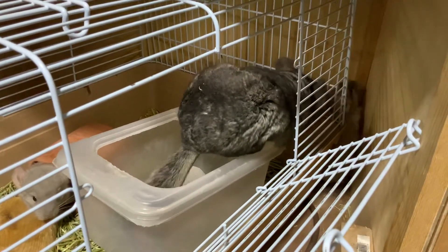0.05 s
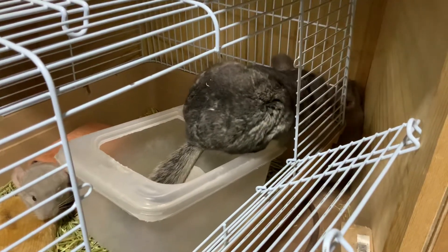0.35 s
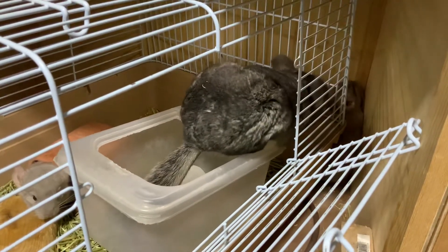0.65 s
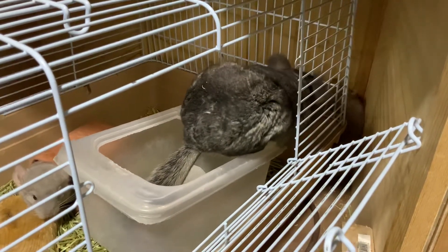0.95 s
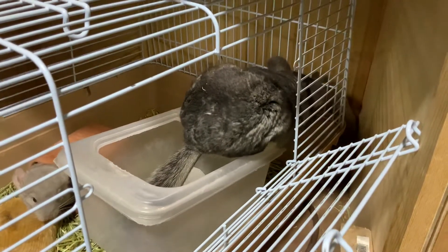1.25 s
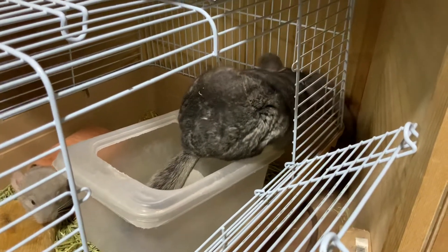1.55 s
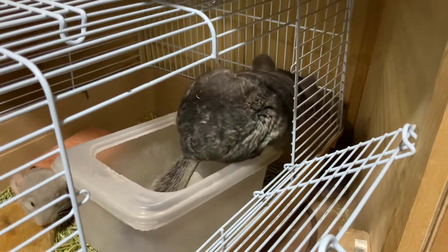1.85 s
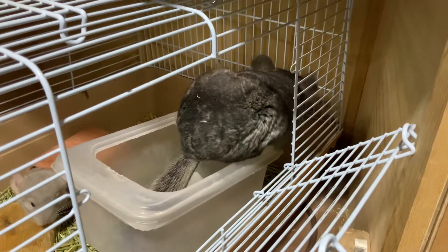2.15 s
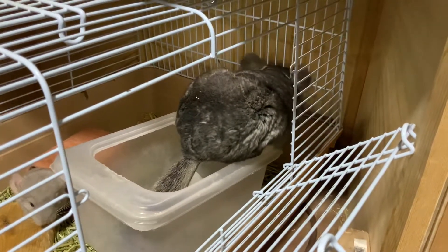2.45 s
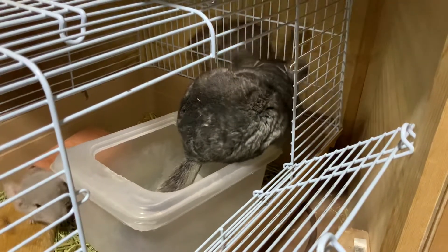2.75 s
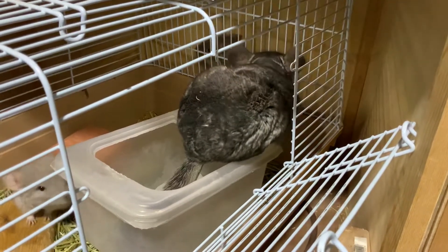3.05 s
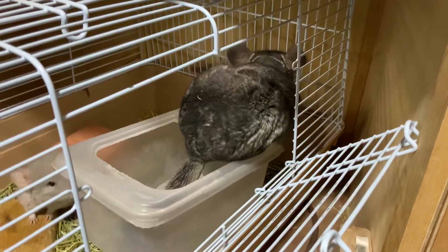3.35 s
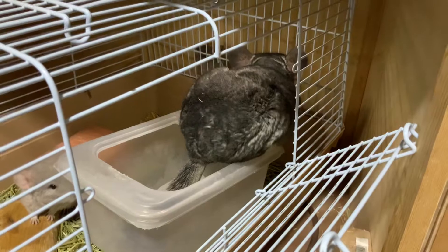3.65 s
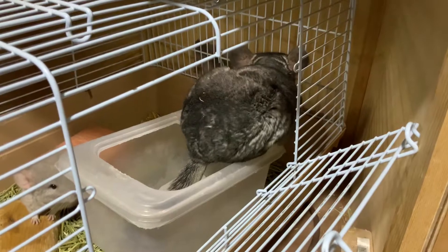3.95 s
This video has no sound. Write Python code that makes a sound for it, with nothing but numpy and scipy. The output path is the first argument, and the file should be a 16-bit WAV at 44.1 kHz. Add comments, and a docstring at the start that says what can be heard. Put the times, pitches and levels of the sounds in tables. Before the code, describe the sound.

One loud, two-part squeak of cage wire rings out briefly at about 2.9 seconds. Before it, a chinchilla shifts in a plastic tub: faint fur rustles and grit ticks, growing busier from 2 seconds with hollow paw taps and soft thumps. A knock follows at 3.2 seconds and the rustling fades by 4. The quiet room holds a low rumble and a faint throbbing hiss.

```python
"""Cage wire gives one loud, two-part squeak with a metallic ring near three seconds, most likely as a
chinchilla pushes on it: the wire catches, scrapes by stick-slip friction and springs free. The animal
shifts about in a plastic tub inside the cage: fur rustles, grit ticks, paws tap the hollow tub and its
body thumps softly. The quiet room holds a rumble, an ebbing drone, a faint throbbing hiss and,
barely audible, a whine and two whistles."""
import sys
import numpy as np
from scipy import signal
from scipy.fft import rfft, irfft
from scipy.io import wavfile

SR = 44100
rng = np.random.default_rng(int(sys.argv[2]) if len(sys.argv) > 2 else 0)


def to_wav(sig):
    """Store sig (one row per channel, or 1-D mono) as 16-bit WAV at the path in sys.argv[1].

    Samples outside -1..1 are clipped; the rate is SR.
    """
    pcm = np.clip(np.atleast_2d(sig), -1, 1) * 32767
    pcm = np.round(pcm).astype(np.int16)
    wavfile.write(sys.argv[1], SR, pcm.T)  # frames by channels


N = 176400
BAND_EDGE_HZ = 15850


def amp(db):
    """Amplitude ratio of a level in decibels."""
    return 10 ** (np.asarray(db) / 20)


def unit(x):
    """Normalisation to rms 1."""
    return x / np.sqrt(np.mean(x ** 2) + 1e-20)


def spectrum_at(points, hz):
    """Interpolation of a spectrum on a logarithmic frequency axis."""
    f, value = np.transpose(points)
    return np.interp(np.log(hz + 1), np.log(f + 1), value)


def since(s):
    """Seconds elapsed since s, zero before."""
    return np.maximum(np.arange(N) / SR - s, 0)


def pan(db):
    """Channel gains for a level difference, left minus right."""
    return amp(np.array([[db], [-db]]) / 2)


def add(mix, s, sound):
    """Superposition of a stereo sound on the mix from time s."""
    part = mix[:, round(s * SR):][:, :sound.shape[1]]
    part += sound[:, :part.shape[1]]


def wander(hz):
    """Random modulation of rms 1: low-pass noise of bandwidth hz."""
    f = np.fft.rfftfreq(N, 1 / SR)
    return unit(irfft(rfft(rng.standard_normal(N)) * np.exp(-(f / hz) ** 2), N))


def noise(colour):
    """Partially coherent stereo noise of rms 1; the common part reaches the left later."""
    # coherence of the two channels: f/Hz, coherence (0-1)
    coherence = [(30, .8), (80, 0.6), (200, 0.5), (1000, 0.2), (3300, 0.1), (4500, 0), (6700, 0),
                 (10000, 0), (15000, .88)]
    left_lag_s = .000657
    hz = np.fft.rfftfreq(N, 1 / SR)
    right, independent = rfft(rng.standard_normal((2, N)))
    common = np.clip(spectrum_at(coherence, hz), 0, 1)
    delayed = right * np.exp(-2j * np.pi * hz * left_lag_s)
    left = common * delayed + np.sqrt(1 - common ** 2) * independent
    gain = amp(spectrum_at(colour, hz)) * (hz < BAND_EDGE_HZ)
    return unit(irfft(np.array([left, right]) * gain, N))


def decay(t, t60):
    """Exponential damping, 60 dB in t60 seconds."""
    return np.exp(-np.log(1000) * t / t60)


def impact(s, rise_s, t60):
    """Impact envelope: linear rise from time s, exponential decay."""
    t = since(s)
    return np.minimum(t / rise_s, 1) * decay(t, t60)


def contacts(rows, colour, rise_s, t60):
    """Heavily damped impacts, each a burst of coloured noise."""
    return noise(colour) * sum(amp(db) * impact(s, rise_s, t60) for s, db in rows)


def room_noise():
    """Ambient noise: a steady rumble and a low drone that ebbs away."""
    # rumble spectrum: f/Hz, relative level/dB
    rumble_spectrum = [(20, -5), (32, -3), (60, -4.5), (110, -21.5), (170, -25), (250, -22.5), (350, -11),
                       (480, -27), (700, -26.5), (1000, -34.5), (1700, -41.5), (2300, -35.5), (3400, -33.5),
                       (4500, -37.5), (6700, -40.5), (8000, -46.5), (15500, -46.5)]
    # drone spectrum: f/Hz, relative level/dB
    drone_spectrum = [(120, -26.5), (200, -1.5), (260, -6.5), (330, 0.5), (400, -2.5), (480, -11.5),
                      (650, -9), (900, -25), (1500, -34.5)]
    # drone envelope: t/s, level/dB
    drone_level = [(0, -69.5), (.4, -71), (1.3, -71.5), (1.8, -84), (2.4, -83), (4, -88)]
    ebb = amp(np.interp(since(0), *np.transpose(drone_level)))
    return amp(-62.5) * noise(rumble_spectrum) + ebb * noise(drone_spectrum)


def throbbing_hiss():
    """Periodic amplitude modulation makes a thin hiss throb, as of a small motor."""
    # hiss spectrum: f/Hz, relative level/dB
    spectrum = [(1500, -38.5), (2200, -6.5), (2600, -10.5), (3130, -0.5), (3270, -2.5), (3400, 4.5),
                (3560, 5), (3660, -3.5), (3750, -1), (3950, -9.5), (4600, -12.5), (4910, -9), (5200, -12.5),
                (6000, -15.5), (6650, -4), (7050, -13), (7800, -27), (10500, -19.5), (13000, -18.5),
                (15500, -23.5)]
    # slow envelope beneath the throb: t/s, level/dB
    level = [(0, -65.5), (.7, -69.5), (1.3, -66), (2, -67), (2.6, -64), (4, -66.5)]
    throb_hz, depth, peak_s = 11.52, .55, .055
    t = since(0)
    throb = 1 + depth * np.cos(2 * np.pi * throb_hz * (t - peak_s))
    return amp(np.interp(t, *np.transpose(level))) * throb * noise(spectrum)


def grit_ticks():
    """Brief, hard contacts of grit put their energy in the treble."""
    # ticks: t/s, level/dB
    ticks = [(.1755, -58.5), (1.1368, -61), (1.4331, -60.5), (1.5229, -64), (1.7998, -51), (1.9674, -58.5),
             (2.1355, -63), (2.1909, -48.5), (2.4404, -63.5), (2.8535, -38), (3.2095, -45.5)]
    # tick spectrum: f/Hz, relative level/dB
    spectrum = [(2000, -21.5), (6000, -12.5), (8500, -0.5), (12000, 2), (15500, -2)]
    return contacts(ticks, spectrum, rise_s=0.0009, t60=0.038)


def whine():
    """Random modulation spreads a soft, falling tone into a narrow band of noise."""
    start_s, length_s, start_hz, fall_hz_per_s = 0.3, .21, 1520, 880
    t = np.minimum(since(start_s), length_s)
    tone = np.sin(2 * np.pi * (start_hz * t - fall_hz_per_s * t ** 2 / 2))
    return amp(-76.5) * np.sin(np.pi * t / length_s) * tone * wander(hz=99)


def rustle():
    """Friction noise swells and fades with each brush: grainy fur over duller bedding."""
    # brushes: t/s, duration/s, fur level/dB, bedding level/dB
    brushes = [(0.32, 0.19, -101, -70), (0.903, .16, -65.5, -64), (1.13, 0.14, -76, -82),
               (1.414, 0.26, -77, -92), (1.635, .12, -72.5, -73), (2.012, .17, -64.5, -66),
               (2.181, 0.18, -59.5, -68.5), (2.483, 0.1, -57.5, -61), (2.553, 0.083, -59.5, -56.5),
               (2.631, 0.084, -53, -53), (2.687, 0.2, -52, -60), (3.02, 0.19, -54.5, -56),
               (3.17, .18, -63.5, -66.5), (3.318, 0.18, -67, -66), (3.49, .12, -74, -76),
               (3.869, 0.32, -71, -71.5)]
    # fur spectrum: f/Hz, relative level/dB
    fur_spectrum = [(1000, -27), (3000, -4.5), (4500, -4), (7000, -5), (9300, -2), (12000, 1.5),
                    (15500, -4.5)]
    # bedding spectrum: f/Hz, relative level/dB
    bedding_spectrum = [(100, 2.5), (350, -5), (800, -1), (1500, -10), (2000, -7), (3500, -15.5),
                        (6000, -21), (12000, -36)]
    grain_db = 3
    fur, bedding = np.zeros((2, N))
    for s, length, fur_db, bedding_db in brushes:
        progress = np.minimum(since(s) / length, 1)
        arch = np.abs(np.sin(np.pi * progress)) ** 0.76
        fur += amp(fur_db) * arch
        bedding += amp(bedding_db) * arch
    friction = fur * noise(fur_spectrum) + bedding * noise(bedding_spectrum)
    return friction * unit(amp(grain_db * wander(hz=150)))


def paw_taps():
    """Each impact of a paw knocks dully and excites the resonances of the hollow tub."""
    # taps: t/s, knock level/dB, tub level/dB
    taps = [(.947, -56.5, -81), (1.392, -63, -74), (1.69, -73, -64.5), (1.712, -67, -65),
            (2.143, -58, -55.5), (2.181, -55, -53), (2.571, -58, -58.5), (2.638, -58.5, -59),
            (2.695, -54, -59.5), (3.208, -42, -61), (3.353, -67, -78), (3.396, -56, -55)]
    # knock spectrum: f/Hz, relative level/dB
    knock_spectrum = [(100, -12.5), (350, 2.5), (700, 0), (1100, -4), (2000, -12.5), (4000, -6),
                      (7000, -21), (12000, -60)]
    # tub resonances: f/Hz, relative level/dB
    tub_spectrum = [(400, -23), (620, -14), (720, 0.5), (810, -10), (930, 2.5), (1030, -2.5), (1130, -2),
                    (1300, -14.5), (1520, -10.5), (1900, -23), (4000, -39)]
    knock = contacts([(s, db) for s, db, _ in taps], knock_spectrum, rise_s=0.0015, t60=0.088)
    tub = contacts([(s, db) for s, _, db in taps], tub_spectrum, rise_s=0.0034, t60=0.14)
    return knock + tub


def whistles():
    """Two faint pure tones glide; phase is the integral of frequency."""
    # glides: t/s, duration/s, start f/Hz, end f/Hz, level/dB
    glides = [(1.34, 0.084, 6100, 5750, -77), (3.906, 0.082, 6100, 6960, -71)]
    out = np.zeros(N)
    for s, length, from_hz, to_hz, db in glides:
        progress = np.minimum(since(s) / length, 1)
        hz = from_hz + (to_hz - from_hz) * progress ** 3
        out += amp(db) * np.sin(np.pi * progress) * np.sin(2 * np.pi * np.cumsum(hz) / SR)
    return out


def body_thumps():
    """Slow, soft contacts of the shifting body put their energy in the bass."""
    # thumps: t/s, level/dB
    thumps = [(2.488, -55.5), (2.642, -45), (2.694, -45.5), (2.8, -64), (2.915, -54.5), (2.99, -47.5)]
    # thump spectrum: f/Hz, relative level/dB
    spectrum = [(30, -17), (55, -3.5), (78, -10.5), (98, 4.5), (118, -9), (300, -14.5), (700, -34.5),
                (2000, -72.5)]
    return contacts(thumps, spectrum, rise_s=0.0087, t60=0.23)


def wire_squeak():
    """Stick-slip friction and two jolts excite the wire's normal modes, and the cage clatters."""
    # wire modes: f/Hz, jolt level/dB, scrape level/dB, T60 after a jolt/s, left minus right/dB
    wire_modes = [(1555, -19, -29, 0.27, -0.5), (1540, -36.5, -39.5, .14, -3), (1765, -26, -18, .15, -7),
                  (2325, -19.5, -19.5, 0.11, -7.5), (2597, -26.5, -19, .19, -2.5),
                  (3566, -34, -33, .12, -7.5), (3832, -26.5, -37.5, 0.27, -3), (4124, -36, -23, .1, 0.5),
                  (4090, -37, -30, .1, -4), (4310, -20, -22, 0.099, -15.5),
                  (4577, -40.5, -35.5, 0.067, -6.5), (5248, -32.5, -31, 0.29, -7),
                  (5660, -38.5, -30.5, 0.09, -3.5)]
    # thin upper modes: f/Hz, relative level/dB
    overtones = [(6400, -6), (6620, -5.5), (7050, -3.5), (8250, -7.5), (8480, -1), (8660, -6), (9330, -3.5),
                 (9500, -5), (9850, 0.5), (10150, -7), (11015, 0.5), (11220, -5), (11384, -3.5),
                 (11600, 4.5), (11933, -1), (12120, -3), (12320, -3), (12830, -5.5), (13220, -1),
                 (14100, -7), (14950, -4.5), (15250, -2)]
    # jolts: t/s, ring gain/dB, clatter level/dB
    jolts = [(2.9111, 1.5, -21.5), (2.9865, 0.5, -22.5)]
    # scraping force: t/s, level/dB
    scrape_force = [(2.893, -45.5), (2.902, -20), (2.91, -18.5), (2.9115, 3), (2.925, -8.5), (2.938, -5.5),
                    (2.951, -1), (2.961, -16), (2.98, -15), (2.99, -12), (3.03, -15.5), (3.07, -29.5),
                    (3.09, -60.5)]
    # spectrum of the whole cage clattering: f/Hz, relative level/dB
    clatter_spectrum = [(100, -28.5), (400, -18.5), (650, -7), (850, -19), (1100, -2), (1700, -3),
                        (2000, -4.5), (2500, 0.5), (3100, -16), (4300, -3.5), (5000, -15.5), (6000, -27),
                        (6700, -9.5), (7500, -27), (9000, -21), (12500, -15.5), (15500, -22)]
    # spectrum of the scraping noise: f/Hz, relative level/dB
    scrape_spectrum = [(300, -24.5), (850, -18), (1100, -3), (1700, 0), (2050, -15), (2500, -6.5),
                       (3200, -13.5), (4300, -4), (5000, -11), (5600, -12.5), (6000, -30.5), (9000, -24),
                       (15500, -31.5)]
    slips_per_s, slip_spread_db, slip_t60 = 900, 4.5, 0.084
    ring_rise_s, clatter_rise_s = 0.0021, 0.0026
    mute_s, mute_db_per_s_per_khz = 3.06, 80

    modes = wire_modes + [(hz, db - 38, db - 36, .13, 0) for hz, db in overtones]
    force = amp(np.interp(since(0), *np.transpose(scrape_force), left=-200, right=-200))
    start, n = scrape_force[0][0], SR // 2
    age = np.arange(n) / SR
    push = force[round(start * SR):][:n]
    muted_for = np.maximum(start + age - mute_s, 0)
    out = np.zeros((2, N))
    for hz, jolt_db, scrape_db, t60, pan_db in modes:
        strength = push * amp(slip_spread_db * rng.standard_normal(n))
        slips = strength * (rng.random(n) < slips_per_s / SR)
        channel_phase = 1.4 * rng.uniform(-0.77, 1, (2, 1))
        tone = np.sin(2 * np.pi * hz * age + channel_phase)
        wire = signal.fftconvolve(slips[None], tone * decay(age, slip_t60), axes=1)[:, :n]
        wire *= amp(scrape_db) * np.sqrt(np.sum(push ** 2) / np.sum(wire ** 2))
        ring = tone * np.minimum(age / ring_rise_s, 1) * decay(age, t60)
        for s, ring_db, _ in jolts:
            add(wire, s - start, ring * amp(jolt_db + ring_db))
        mute = amp(-mute_db_per_s_per_khz * hz / 1000 * muted_for)  # the treble dies first
        add(out, start, wire * mute * pan(pan_db))

    shake = np.zeros(N)
    for s, _, db in jolts:
        tail = amp(-4.5) * impact(s, clatter_rise_s, t60=0.23)
        shake += amp(db) * (impact(s, clatter_rise_s, t60=0.05) + tail)
    return out + shake * noise(clatter_spectrum) + amp(-23) * force * noise(scrape_spectrum)


def wire_squeal():
    """Friction makes one mode sing briefly, sagging in pitch, as the wire slides free."""
    start_s, length_s, start_hz, fall_hz_per_s = 2.9855, .019, 2362, 3600
    t = np.minimum(since(start_s), length_s)
    tone = np.sin(2 * np.pi * (start_hz * t - fall_hz_per_s * t ** 2 / 2))
    return amp(-9.5) * pan(-4) * np.sin(np.pi * t / length_s) ** 2 * tone


def reverberation(x):
    """Diffuse reflections form a faint, short tail, independent in each channel."""
    t = np.arange(SR // 2) / SR
    tail = rng.standard_normal((2, len(t))) * decay(t, t60=.5)
    return amp(-30.5) * signal.fftconvolve(x, tail / np.linalg.norm(tail[0]), axes=1)[:, :N]


def scene():
    """Superposition of the background, the animal, the wire and their reverberation."""
    near = rustle() + grit_ticks() + paw_taps() + body_thumps() + wire_squeak() + wire_squeal()
    background = throbbing_hiss() + room_noise() + whine() + whistles()
    return background + near + reverberation(near)


def record(dry):
    """A linear-phase low-pass filter limits the bandwidth."""
    lowpass = signal.firwin(255, BAND_EDGE_HZ, window=("kaiser", 9), fs=SR)
    return signal.oaconvolve(dry, lowpass[None], "same")


dry = scene()
out = record(dry)
to_wav(out)
```